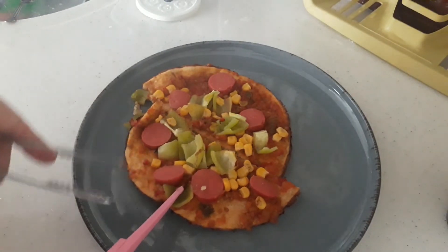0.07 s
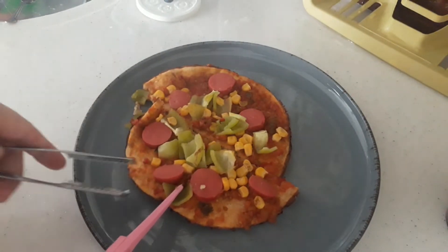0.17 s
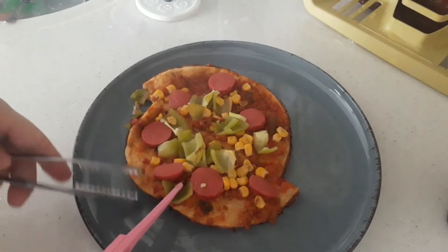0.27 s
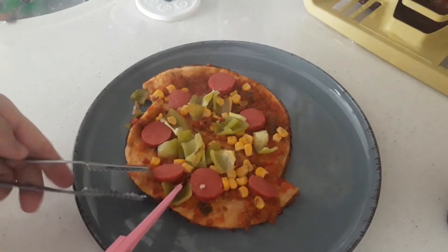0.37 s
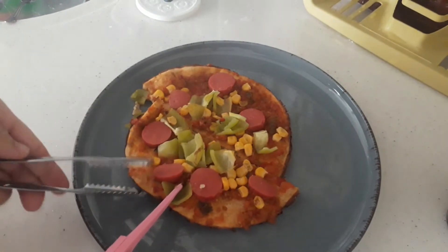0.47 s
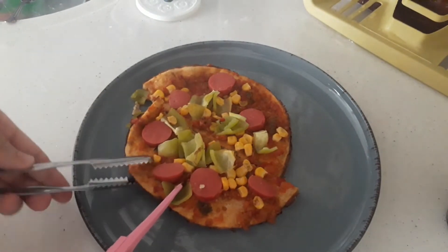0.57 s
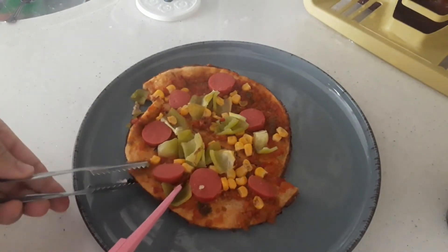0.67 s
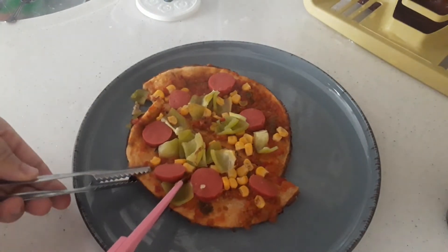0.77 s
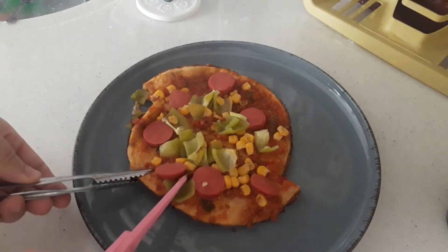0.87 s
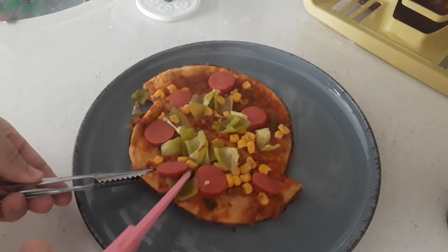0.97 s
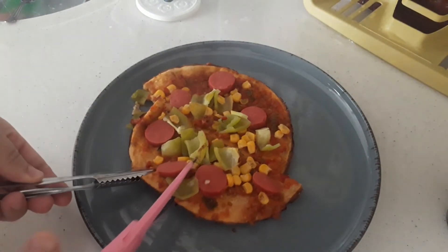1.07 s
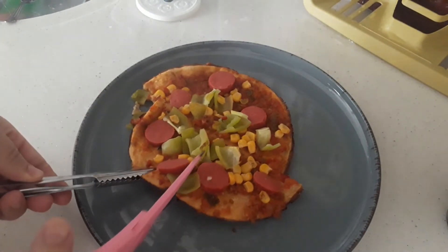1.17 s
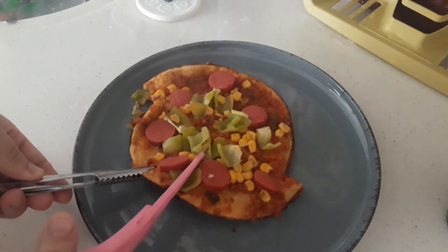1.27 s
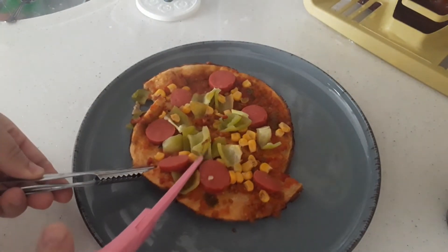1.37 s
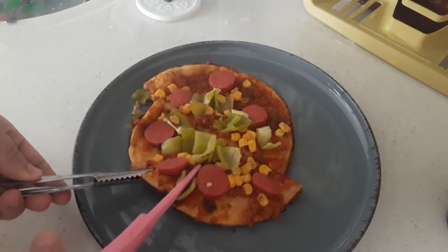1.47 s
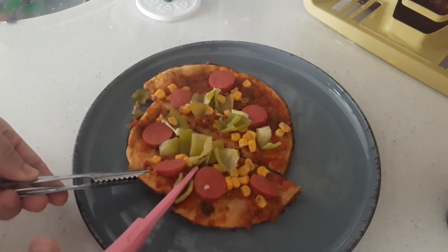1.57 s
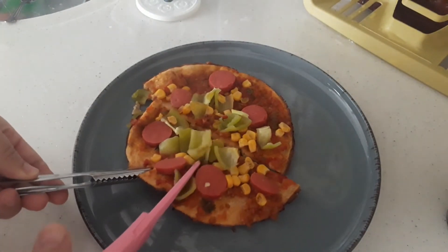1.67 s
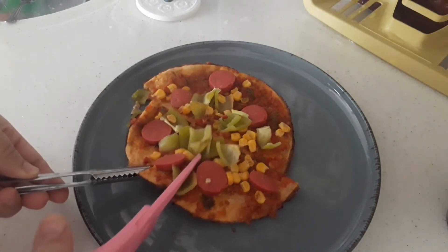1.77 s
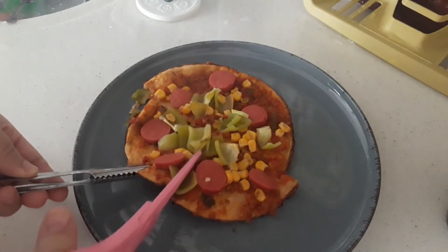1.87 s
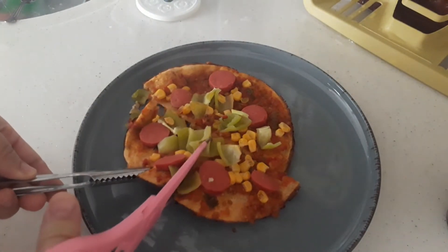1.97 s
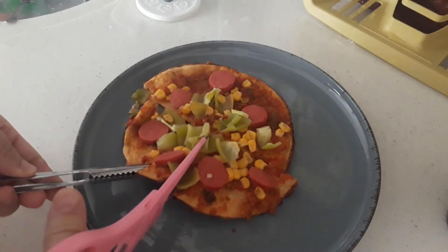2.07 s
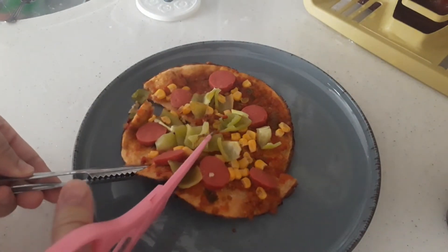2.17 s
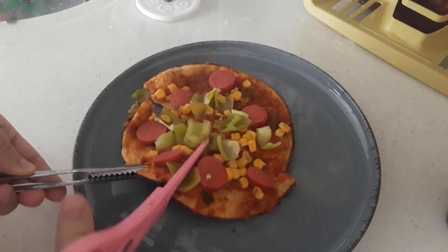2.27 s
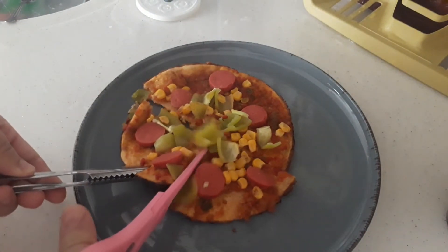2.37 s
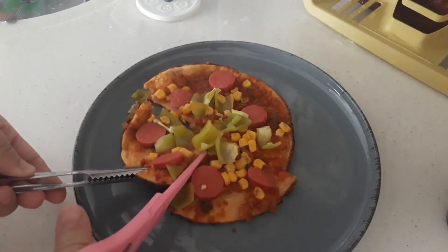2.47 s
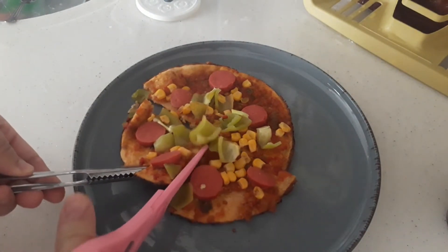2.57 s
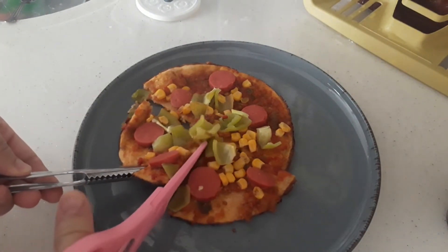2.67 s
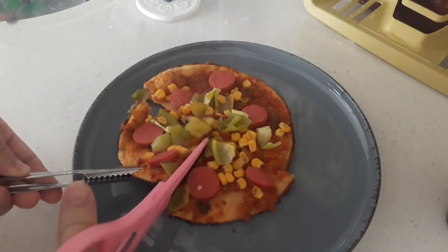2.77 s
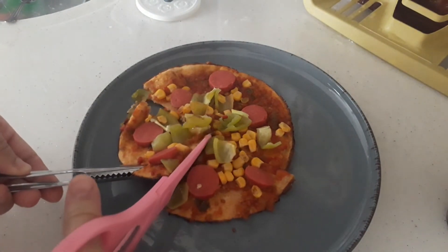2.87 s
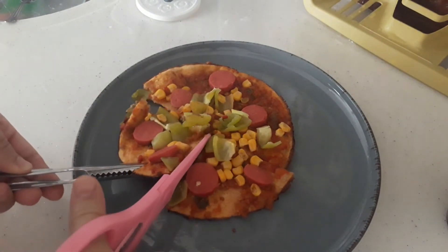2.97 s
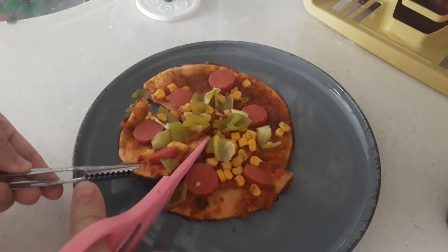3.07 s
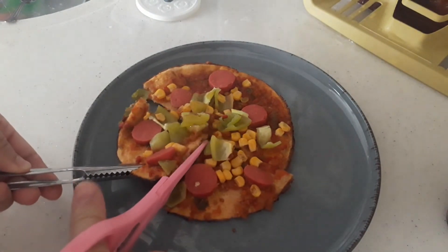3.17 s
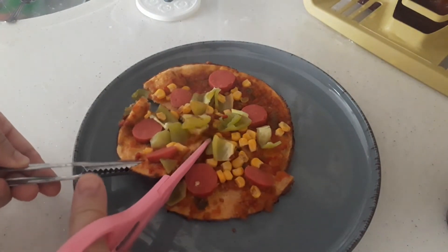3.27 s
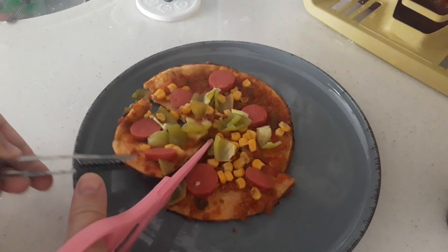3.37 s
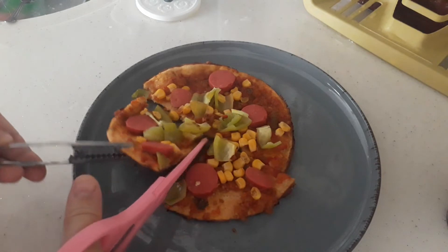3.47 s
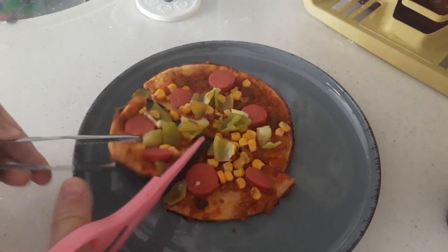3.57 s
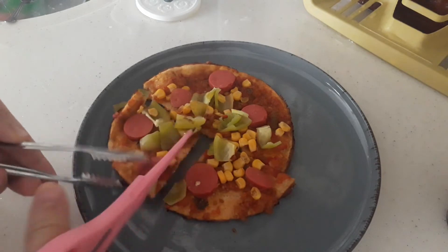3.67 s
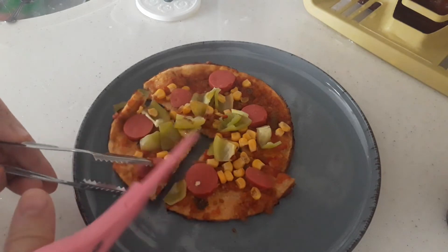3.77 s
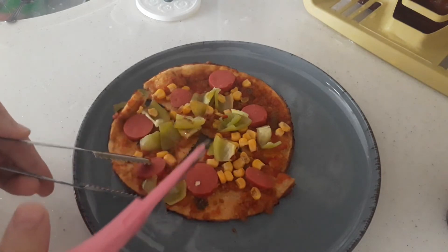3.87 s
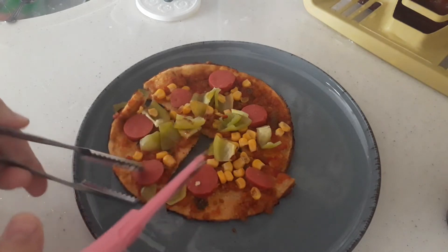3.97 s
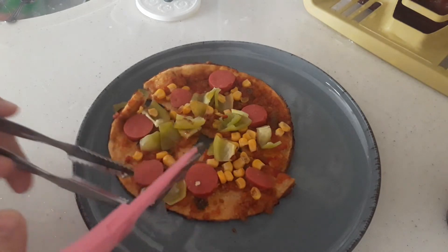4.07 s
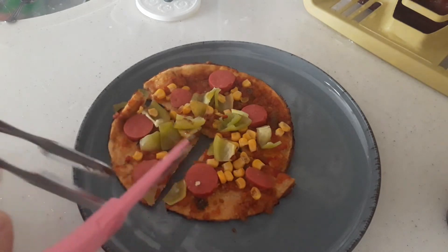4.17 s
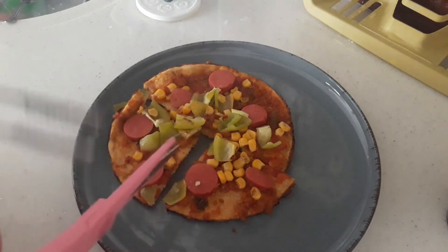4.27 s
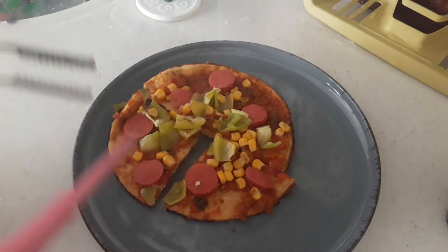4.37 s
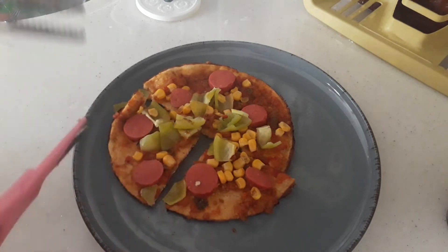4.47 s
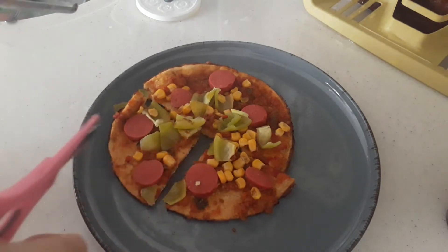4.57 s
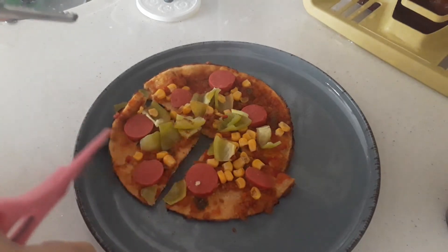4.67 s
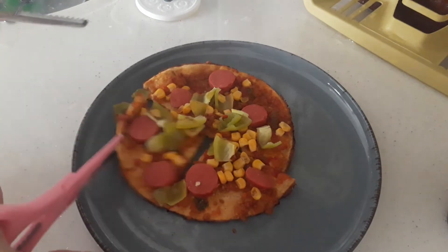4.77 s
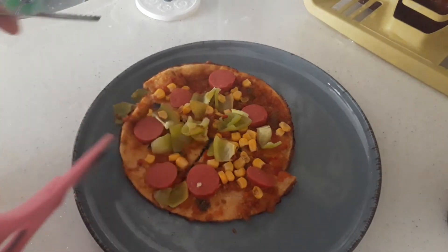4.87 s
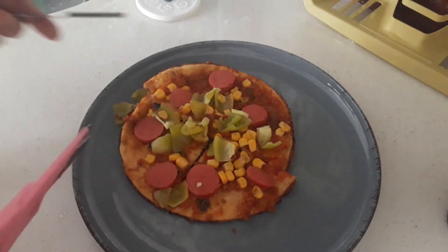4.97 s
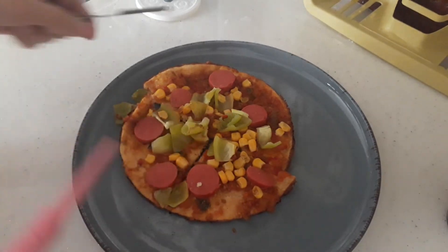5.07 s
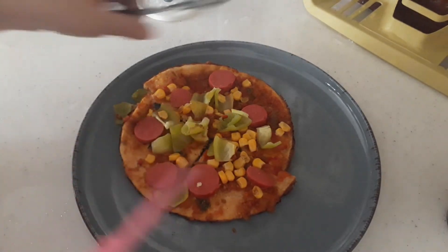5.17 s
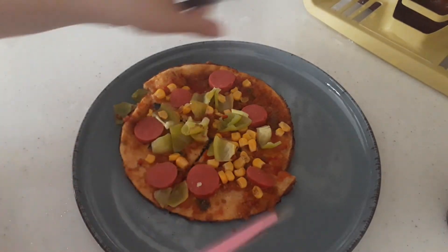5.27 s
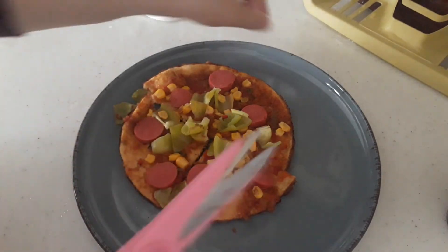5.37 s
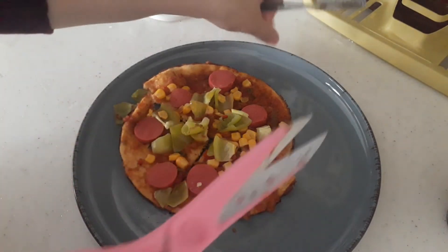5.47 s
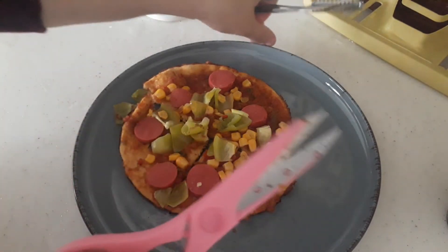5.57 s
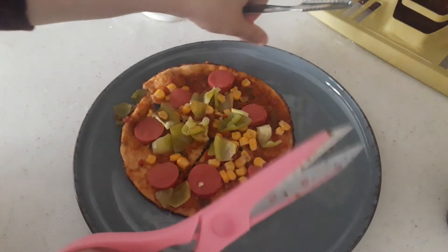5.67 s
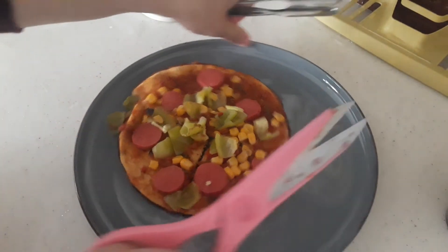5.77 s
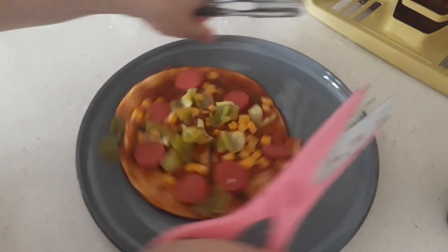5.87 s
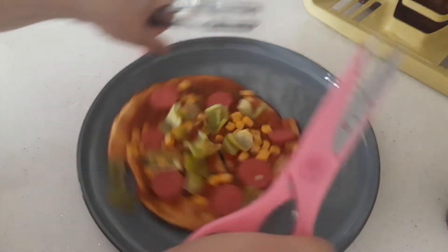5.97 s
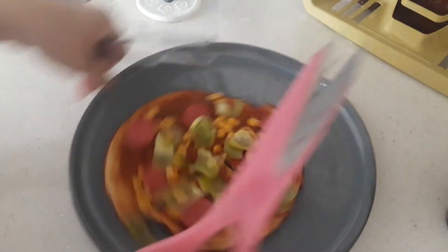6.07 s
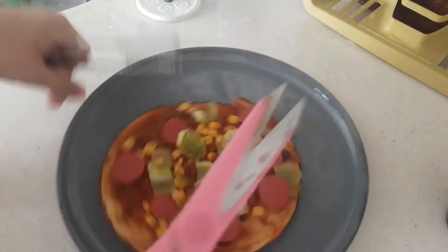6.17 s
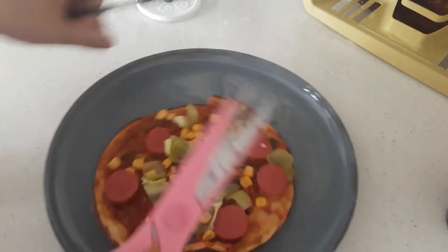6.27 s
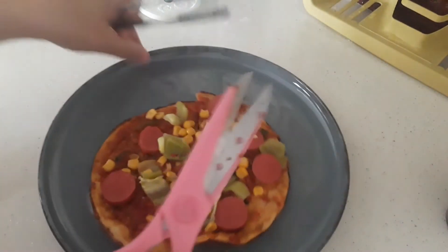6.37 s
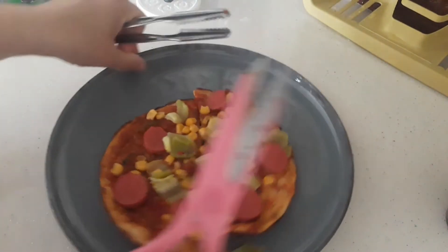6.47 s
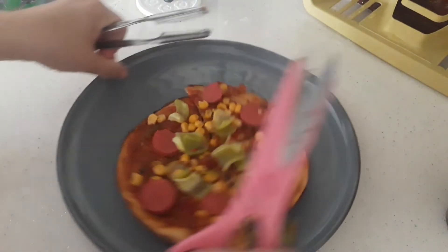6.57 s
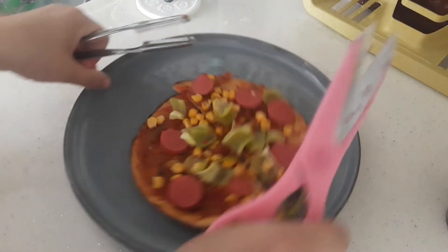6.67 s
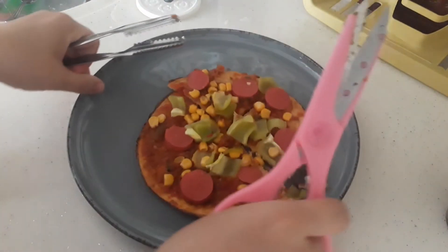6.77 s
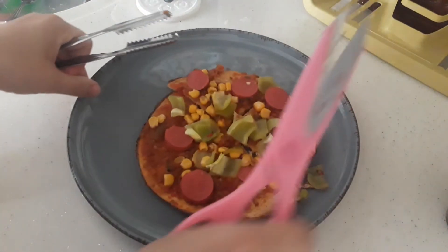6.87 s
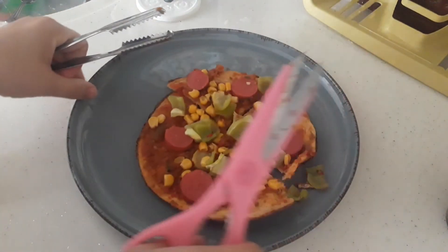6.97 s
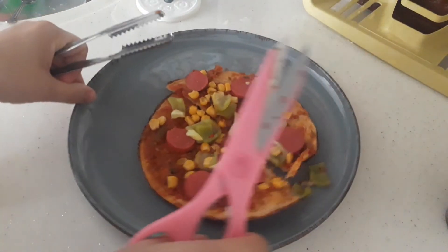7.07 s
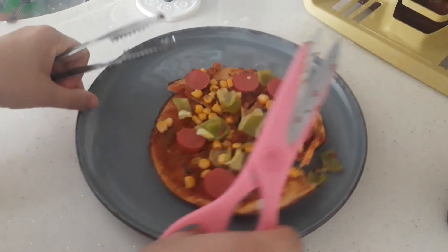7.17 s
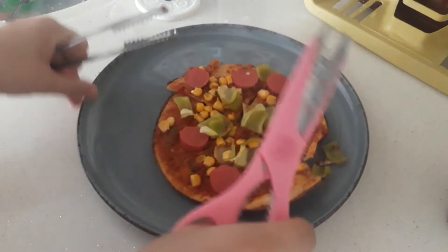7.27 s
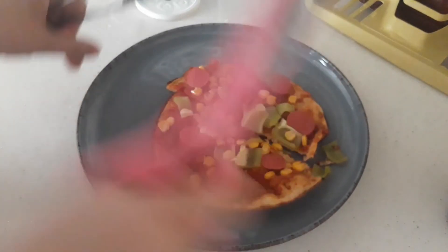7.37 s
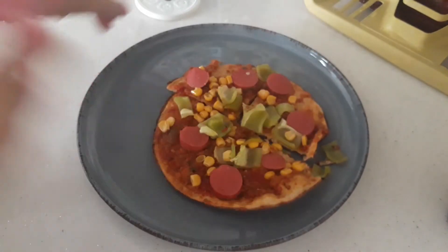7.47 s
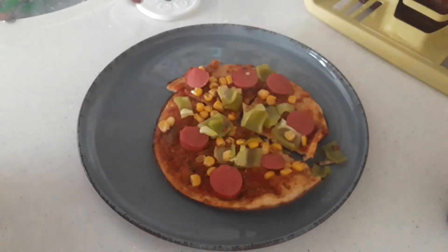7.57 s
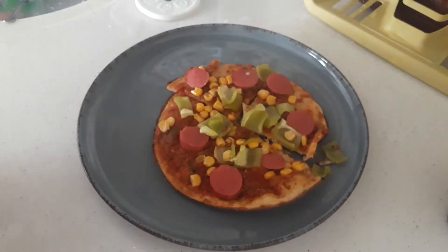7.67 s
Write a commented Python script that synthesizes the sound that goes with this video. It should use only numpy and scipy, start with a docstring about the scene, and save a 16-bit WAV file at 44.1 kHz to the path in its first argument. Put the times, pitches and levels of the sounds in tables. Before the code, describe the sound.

A small, quiet kitchen heard close up, with faint air, low appliance hum, a thin whistle and distant rumble. At 0.5 s tongs touch a stoneware plate; a hard, bright clink lands at 0.6 s, then a quick cluster of ticks and scissor knocks from 0.85 to 1.1 s. After soft brushing, faint creaks begin near 1.4 s, and irregular woody knocks and dry crust crunches thicken from 1.6 to 2.7 s. They resume at 3.0 s and peak at 3.15 s in a loud snap with plate ring and worktop thump, fading by 3.45 s. A sharp clink comes at 3.7 s, a fainter one at 3.9 s, and a ringing rim tap with a thud at 4.7 s. Soft rustle follows. From about 5.7 s the plate grinds gritty and rough; at 6.1 s it clatters and rocks in quick weakening taps. Grinding continues to 6.85 s, with small bumps, and a last short scrape at 7.1-7.35 s gives way to soft hiss.

```python
"""A quiet kitchen, close up: scissors work through a thin pizza on a stoneware plate.
Steel clinks ring plate and tong modes; stick-slip bursts make the scissors knock and creak and the crust
crunch; jolts thump the worktop. Then the plate is turned, its foot ring grinding: rough noise drives the
plate and worktop modes. Behind it lie room air, an appliance's faint hum and whistle, a far-off low rumble
and soft swells of hiss: brushing, and what lingers after knocks."""
import sys
import numpy as np
from scipy import signal
from scipy.fft import rfft, irfft
from scipy.io import wavfile
from scipy.ndimage import uniform_filter1d

SR = 44100
rng = np.random.default_rng(int(sys.argv[2]) if len(sys.argv) > 2 else 0)


def wav_out(sig):
    """Save sig, one row per channel (or a flat mono array), as 16-bit PCM at SR to the path in sys.argv[1]."""
    wavfile.write(sys.argv[1], SR, np.round(np.clip(np.atleast_2d(sig).T, -1, 1) * 32767).astype(np.int16))


N = 339565

# stoneware plate modes: f/Hz, undamped t60/s, level/dB struck in the well, struck on the rim, dragged
PLATE_MODES = [(1305, 0.2, -25, -19, -6.5), (1786, 0.08, -4, -19.5, 4), (2090, 0.11, -12, -21, -7),
               (2434, 0.068, 2.5, -15, -4), (2569, 0.15, -4, -27.5, 1), (3125, 0.15, -15, 4, -13),
               (3434, 0.072, 2.5, -17, -13), (3575, 0.092, 0, -26, -2.5), (3817, 0.13, -15.5, -22, -4.5),
               (4210, 0.24, -21, -8.5, -40), (4625, 0.13, -5, -10, 3), (4766, 0.079, 5.5, -17.5, 3),
               (5357, .14, -24.5, -4, -55.5), (6060, 0.065, -6, -22, -2.5), (6640, 0.11, -7.5, -18.5, -53),
               (7610, .13, -11, -18.5, -17), (9360, 0.07, -15, -37, -24), (11020, 0.13, -21, -13.5, -24.5),
               (11900, 0.083, -15.5, -30, -23), (11930, 0.13, -18, -14, -37), (14060, .1, -11, -23, -26),
               (14200, .1, -20, -41, -28)]
# worktop modes under the plate: f/Hz, undamped t60/s, level/dB
WORKTOP_MODES = [(105.4, 0.25, -3.5), (154.4, 0.18, 6), (214, 0.047, -11.5), (328, 0.13, -1.5),
                 (373.2, 0.056, 3.5), (584, 0.12, -20), (688.5, 0.045, -4.5), (771, 0.053, -3.5),
                 (1108, 0.039, -18), (1316, 0.1, -11.5), (1543, 0.14, -14), (2036, 0.04, -27)]
# turns of the plate: start t/s, end t/s, rise/s, level/dB, sag/(dB per s)
PLATE_TURNS = [(5.654, 6.524, 0.22, -42, 17), (6.413, 6.847, 0.085, -45, 3.5),
               (7.088, 7.351, 0.052, -50.5, 13)]


def undb(db):
    """Decibels to amplitude."""
    return 10 ** (np.asarray(db) / 20)


def unit(x):
    """Scale to rms 1."""
    return x / np.sqrt(np.mean(x ** 2))


def coloured(points):
    """Noise of rms 1 whose spectrum joins (f/Hz, level/dB) points."""
    hz, db = np.transpose(points)
    bin_hz = np.arange(1, N // 2 + 2) * SR / N
    gain = undb(np.interp(np.log(bin_hz), np.log(hz), db))
    return unit(irfft(rfft(rng.standard_normal(N)) * gain, N))


def ring(x, hz, t60):
    """One damped mode driven by x; a unit impulse rings with a peak near 1."""
    r, w = np.exp(-np.log(1000) / (t60 * SR)), 2 * np.pi * hz / SR
    return signal.lfilter([0, np.sin(w)], [1, -2 * r * np.cos(w), r * r], x)


def add(out, s, sound, db):
    """Lay a sound at time s with its peak at db."""
    i = int(s * SR)
    levelled = sound * undb(db) / np.max(np.abs(sound))
    out[i:i + len(sound)] += levelled[:N - i]


def walk(rate):
    """Random levels held 1 / rate s and slewed; spread near 1."""
    k = int(SR / rate)
    steps = np.repeat(rng.standard_normal(N // k + 1), k)
    return 1.2 * uniform_filter1d(steps, k)[:N]


def slip(ms, sparse=3.2):
    """A burst of uneven stick-slip pushes that swells to its height in ms / 2, then fades."""
    t = np.arange(SR // 5) / SR / (ms / 1000)
    pushes = 0.42 + rng.standard_normal(len(t)) ** 3 * sparse  # the cube makes strong pushes rare
    return t * np.exp(-2 * t) * pushes


def creak(modes, ms, bite_db):
    """A slip locked to a body's ringing feeds every mode in step, so the knock swells; more bite is brighter."""
    t = np.arange(SR // 4) / SR
    x = t / (ms / 1000)
    roughness_db = 37.0 * uniform_filter1d(rng.standard_normal(len(t)), size=32)
    effort = x * np.exp(-2 * x) * undb(roughness_db)
    phase = rng.uniform(0, 2 * np.pi, len(modes))
    grip_db = 2.5 * rng.standard_normal(len(modes))
    out = np.zeros(len(t))
    for (hz, t60, db), p, grip in zip(modes, phase, grip_db):
        push = effort * np.sin(2 * np.pi * hz * t + p)
        out += undb(db + grip + bite_db * np.log2(hz)) * ring(push, hz, t60)
    return out


def kitchen():
    """Room air and soft swells are shaped noise; appliance tones and low rumble are noise through resonances."""
    # spectrum of the room air: f/Hz, level/(dB per Hz), relative
    air_colour = [(24, -35), (40, -10.5), (118, -17), (137, -10), (228, -13.5), (258, -18.5), (449, -18),
                  (673, -20), (2090, -26), (2490, -28), (2760, -31), (5180, -29.5), (7750, -43),
                  (15300, -36.5), (16500, -49.5)]
    # appliance hum and whistle: f/Hz, width/Hz, mean level/dB
    appliance_tones = [(107.4, 8.5, -70.5), (153.2, 2.7, -72.5), (215, 7.9, -77.5), (2530, 27, -75),
                       (2470, 22, -77)]
    # far-off low rumble: t/s, level/dB
    rumble_levels = [(0.0, -72), (1.26, -85), (4.18, -68), (7.03, -94), (7.7, -80.5)]
    # soft broadband swells, brushing and the faint hiss that lingers after knocks:
    # start t/s, length/s, level/dB at the height of the swell
    soft_swells = [(0.262, 0.048, -57), (1.107, 0.26, -60), (2.132, 0.11, -60.5), (2.748, 0.21, -64.5),
                   (3.247, 0.31, -63), (3.586, 0.11, -63), (3.928, 0.06, -63), (4.135, .19, -60.5),
                   (4.456, 0.27, -63), (4.758, 0.13, -52.5), (5.381, 0.31, -54.5), (6.88, 0.28, -67.5),
                   (7.342, 0.26, -66), (7.494, 0.25, -56.5)]
    # spectrum of the swells: f/Hz, level/(dB per Hz), relative
    swell_colour = [(200, -4), (500, -2.5), (1500, -4), (3000, -4), (6000, -13), (7500, -22.5),
                    (12000, -48), (16000, -30)]
    air_db = -64.5

    out = undb(air_db + 1.0 * walk(1.98)) * coloured(air_colour)
    for hz, width_hz, db in appliance_tones:
        waver = undb(3 * walk(5))
        t60 = np.log(1000) / np.pi / width_hz
        out += undb(db) * waver * unit(ring(rng.standard_normal(N), hz, t60))
    s, rumble_db = np.transpose(rumble_levels)
    rumble = unit(ring(rng.standard_normal(N), 42.0, 0.087))
    out += undb(np.interp(np.arange(N) / SR, s, rumble_db)) * rumble
    swelling = np.zeros(N)
    for s, length, db in soft_swells:
        add(swelling, s, np.sin(np.linspace(0, np.pi, int(length * SR))), db)
    return out + swelling * undb(2.0 * walk(30)) * coloured(swell_colour)


def clinks():
    """A hard tick rings plate and tongs over a short crack; where the plate is struck sets the mix of modes."""
    # steel on the plate: t/s, peak level/dB, rim share (0 well, 1 rim), contact time/ms
    strikes = [(0.533, -43, 0.47, 0.16), (.594, -9.5, 0, 0.0037), (0.616, -25.5, 0.23, 0.095),
               (0.841, -52, 0.4, 0.012), (.878, -22, 0.14, 0.04), (0.947, -23, 0.1, 0.021),
               (0.976, -20.5, 0.23, 0.054), (1.079, -14.5, 0.13, 0.061), (1.976, -16, 0.21, 0.034),
               (3.148, -20.5, .1, 0.011), (3.722, -9, 0.15, 0.0028), (3.872, -30, 0.04, 0.027),
               (4.693, -11, 0.9, 0.044), (6.076, -23, 0.46, 0.15)]
    # steel tong modes: f/Hz, t60/s, level/dB
    tong_modes = [(1281, 0.3, -4), (5460, 0.083, -5), (8660, 0.18, -31), (10265, 0.18, -9.5),
                  (14400, .09, -2.5), (16000, .08, -4.5)]
    # share of the undamped ring time: a light touch in the well stays on and damps;
    # hard blows bounce off, the rim swings freely
    free_light, free_per_peak, free_per_rim = 0.18, 0.99, 0.3
    # tongs at the hardest contact; they ring less for each doubling of the contact time
    hard_tongs_db, hard_ms, tongs_db_per_octave = -12, 0.0026, -6

    out, t = np.zeros(N), np.arange(SR // 3) / SR
    tongs = sum(undb(db) * ring(t == 0, hz, t60) for hz, t60, db in tong_modes)
    for s, peak_db, rim, contact_ms in strikes:
        free = free_light + free_per_peak * undb(peak_db) + free_per_rim * rim
        tongs_db = hard_tongs_db + tongs_db_per_octave * np.log2(contact_ms / hard_ms)
        crack = rng.standard_normal(len(t)) * np.exp(-t / (0.028 * free))
        scatter_db = 0.23 * rng.standard_normal(len(PLATE_MODES))
        phase = rng.uniform(0, 2 * np.pi, len(PLATE_MODES))
        plate = np.zeros(len(t))
        for (hz, t60, well_db, rim_db, _), scatter, p in zip(PLATE_MODES, scatter_db, phase):
            start_db = well_db + rim * (rim_db - well_db) + scatter
            plate += undb(start_db - 60 * t / (free * t60)) * np.sin(2 * np.pi * hz * t + p)
        tick = plate + undb(tongs_db) * tongs + 0.21 * crack
        # a softer contact pushes longer and leaves the high modes quiet
        keep = np.exp(-1000 / (contact_ms * SR))
        add(out, s, signal.lfilter([1], [1, -2 * keep, keep ** 2], tick), peak_db)
    return out


def knocks():
    """The blades slip through crust: the scissors ring briefly, the worktop answers, the crust crunches."""
    # slips of the blades: t/s, peak level/dB, swell/ms, bite/(dB per octave), crunch level/dB against the knock
    slips = [(0.877, -27.5, 3.4, 21, -2.5), (.972, -19.5, 2.9, 20.5, -7.5), (1.075, -28, 4.7, 29.5, -29),
             (1.36, -51, 18.6, -11, -14), (1.42, -40, 16, -17, -11), (1.456, -38.5, 8.3, -2, -0.1),
             (1.632, -33, 2.3, -31, -20), (1.681, -27.5, 5.8, 2.5, -20.5), (1.882, -24, 1, 6, -16),
             (1.929, -29, 4.6, 5, -12), (1.974, -22, 2.5, 7.5, -22), (2.106, -26, 0.37, 11.5, -31),
             (2.264, -45.5, 2.1, -12, -29), (2.299, -33.5, 7.3, 7, -18), (2.323, -25.5, 2.1, 4, -11),
             (2.377, -36, 6.6, 1, -8), (2.405, -21, 3.1, 14, -17.5), (2.422, -21, 1.2, -5, -11.5),
             (2.467, -28.5, 2, 4, 1), (2.588, -38.5, 1.7, 31, 3), (2.6, -29.5, 4.1, -10, -13),
             (2.665, -38, 0.85, -5.5, -28.5), (2.746, -38.5, 1.6, -8.5, -23), (2.998, -43, 1.3, 6, -8.5),
             (3.008, -29.5, 2.8, 6, -23.5), (3.034, -35.5, 4.8, 6, -17.5), (3.087, -34.5, 1.3, 7, -7),
             (3.137, -25, 6.2, 12.5, 0), (3.148, -5, 1.5, 28.5, -3.5), (3.179, -31, 6.8, 30, -8),
             (3.308, -36, 9, 11, -9), (3.382, -41, 4.3, -22.5, -6), (3.443, -53, 2.9, 8, -8)]
    # scissors with their plastic handles: f/Hz, t60/s, level/dB
    scissor_modes = [(790, .04, -10), (880, .05, 0), (920, .04, -7), (1040, .04, -9), (1503, .062, -17),
                     (1990, .03, -36), (2365, .045, -38)]
    # the worktop's answer grows more slowly than the knock: dB at a full-scale knock, dB per dB
    answer_db, answer_share = -24.5, 0.57

    out = np.zeros(N)
    crust = signal.butter(1, [700, 3000], "bandpass", fs=SR)
    dull = signal.butter(4, 7000, fs=SR)
    for s, db, ms, bite_db, crunch_db in slips:
        add(out, s, creak(scissor_modes, ms, bite_db), db)
        add(out, s, creak(WORKTOP_MODES[2:7], ms + 3.0, bite_db=-7.0), answer_db + answer_share * db)
        crunch = signal.lfilter(*crust, slip(2.7 * ms + 3.6))
        # mostly dulled, with a little of the open top left in
        add(out, s, 0.109 * crunch + signal.lfilter(*dull, crunch), db + crunch_db)
    return out


def thumps():
    """Blunt jolts ring the worktop, which sways after them; the quicker ones are brighter and clatter more."""
    # plate or tool jolts the worktop: t/s, peak level/dB, swell/ms, sway level/dB, sway bite/(dB per octave)
    jolts = [(3.152, -17.5, 5.8, -38.5, -1), (3.723, -37, 2.5, -54, 2.5), (4.693, -22, 8.2, -43.5, 1.5),
             (6.074, -23, 1.3, -28.5, -22), (6.106, -21, 1.1, -44, -3), (6.119, -21.5, 1.3, -34, -3),
             (6.5, -35, 10, -43.5, 6), (6.678, -33.5, 2.2, -62, -2), (6.732, -32.5, 5.8, -59, 3)]
    bite_at_1ms_db, bite_db_per_octave = 5, -1.5  # brightness of a 1 ms jolt; slower is duller
    sway_late_s, sway_ms = 0.015, 18.5
    # rocking: eight taps, each weaker than the last, the gaps growing
    rock_s, rock_db, rock_gap_s, rock_loss_db, rock_growth = 6.093, -25.5, 0.022, 2.4, 1.12

    out = np.zeros(N)
    loose = signal.butter(4, [500, 1800], "bandpass", fs=SR, output="sos")
    taps = np.arange(8)
    rocking = []
    for k in taps:
        tap_s = rock_s + rock_gap_s * np.sum(rock_growth ** taps[:k])
        rocking.append((tap_s, rock_db - rock_loss_db * k, 6.0, -200, 0))  # -200 dB: no sway
    for s, db, ms, sway_db, sway_bite_db in [*jolts, *rocking]:
        bite_db = bite_at_1ms_db + bite_db_per_octave * np.log2(ms)
        add(out, s, creak(WORKTOP_MODES[2:], ms, bite_db), db)
        clatter = signal.sosfilt(loose, slip(ms + 7.7))
        add(out, s, clatter, db + bite_db - 5.5)
        add(out, s + sway_late_s, creak(WORKTOP_MODES[:3], sway_ms, sway_bite_db), sway_db)
    return out


def turning():
    """Strength of the grinding: each turn swells, sags and stops."""
    t, fall_s = np.arange(N) / SR, 0.1
    strength = np.zeros(N)
    for start, end, rise_s, db, sag_db in PLATE_TURNS:
        ramp = np.clip(np.minimum((t - start) / rise_s, (end - t) / fall_s), 0, 1)
        sag = sag_db * np.clip(t - start - rise_s, 0, 1)
        strength += ramp ** 2 * undb(db - sag)
    return strength


def drags():
    """Grit under the foot ring drives the plate, damped by the contact, and the worktop."""
    worktop_db, tilt_db = -3.5, 7.5  # worktop against the plate; grit favours its upper modes, dB per octave
    plate_damping, worktop_damping = 0.15, 0.4  # shares of the undamped ring times

    start = int(PLATE_TURNS[0][0] * SR)
    grit = (rng.standard_normal(N) * undb(0.66 * walk(150) + 2.0 * walk(30)))[start:]
    plate = np.zeros(len(grit))
    for hz, t60, _, _, db in PLATE_MODES:
        # foot ring and body resonate in series, which leaves deep gaps between the modes
        foot_ring = ring(grit, hz, plate_damping * t60)
        body = unit(ring(foot_ring, hz, plate_damping * t60))
        # the moving contact favours now one mode, now another
        plate += undb(db + 4.1 * walk(7)[start:]) * body
    scrape_band = signal.butter(4, [450, 5000], "bandpass", fs=SR, output="sos")
    scrape = 0.5 * unit(signal.sosfilt(scrape_band, grit))
    worktop = np.zeros(len(grit))
    for hz, t60, db in WORKTOP_MODES[1:]:
        worktop += undb(db + tilt_db * np.log2(hz)) * unit(ring(grit, hz, worktop_damping * t60))
    sound = turning()[start:] * (unit(plate) + scrape + undb(worktop_db) * unit(worktop))
    return np.pad(sound, (start, 0))


def room(x):
    """Dense noise echoes from 3 ms on; each octave dies at its own pace."""
    # reverberation: f/Hz, t60/s
    decay_times = [(200, 0.5), (1000, 0.38), (4000, 0.32), (12000, 0.25)]
    room_db = -11

    t = np.arange(SR // 2) / SR
    tail = np.zeros(len(t))
    hz, t60 = np.transpose(decay_times)
    for centre in 125 * 2. ** np.arange(8):
        edges = [centre / np.sqrt(2), min(centre * np.sqrt(2), 20000)]
        octave = signal.butter(2, edges, "bandpass", fs=SR)
        band = signal.lfilter(*octave, rng.standard_normal(len(t)))
        tail += band * np.exp(-np.log(1000) * t / np.interp(np.log(centre), np.log(hz), t60))
    tail *= np.clip(t / 0.003 - 1, 0, 1)  # fades in from 3 to 6 ms
    return undb(room_db) * signal.fftconvolve(x, tail / np.sqrt(np.sum(tail ** 2)))[:N]


def scene():
    """The close sounds, their echoes in the room and the kitchen behind, in mono."""
    near = clinks() + knocks() + thumps() + drags()
    # a high-pass at 90 Hz thins the bass of all the close sounds
    near = signal.sosfilt(signal.butter(4, 90, "highpass", fs=SR, output="sos"), near)
    return (near + room(near) + kitchen())[None]


def record(dry):
    """The phone cuts the top: a steep low-pass at 16 kHz."""
    return signal.sosfilt(signal.ellip(8, .2, 70, 16000, fs=SR, output="sos"), dry)


dry = scene()
out = record(dry)
wav_out(out)
```